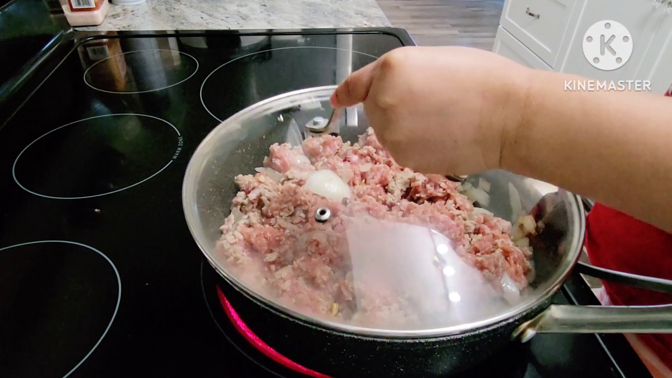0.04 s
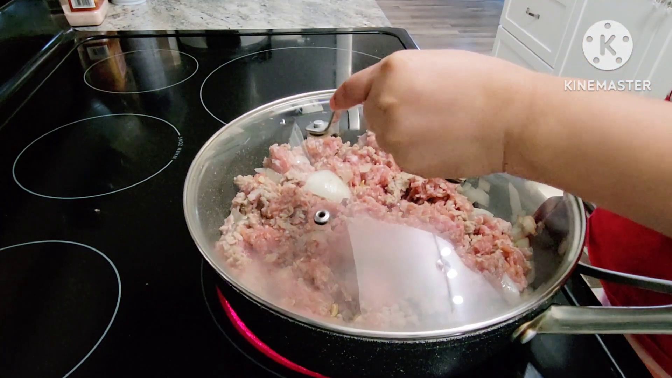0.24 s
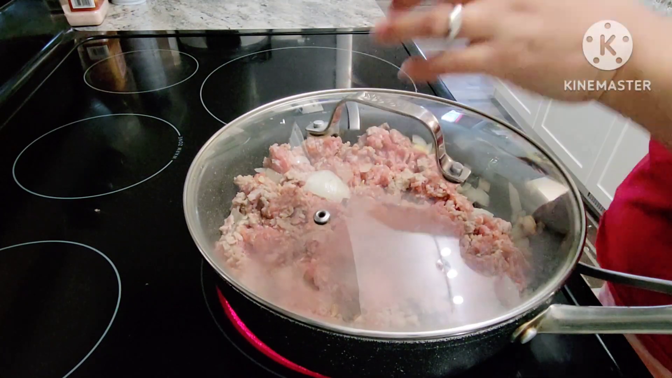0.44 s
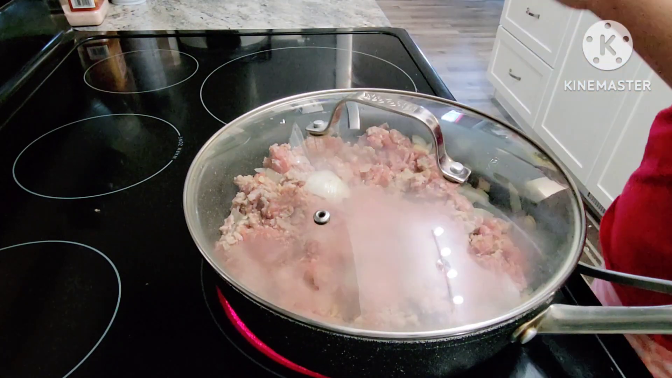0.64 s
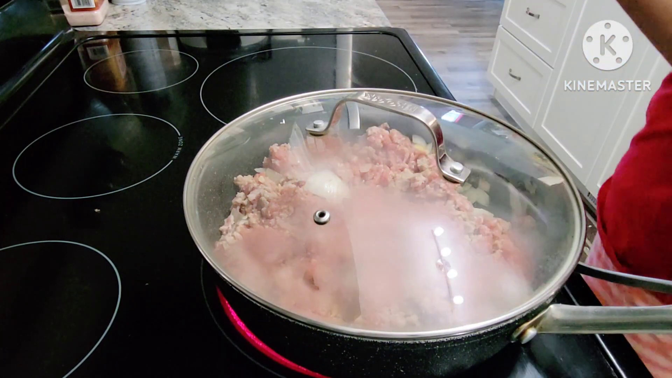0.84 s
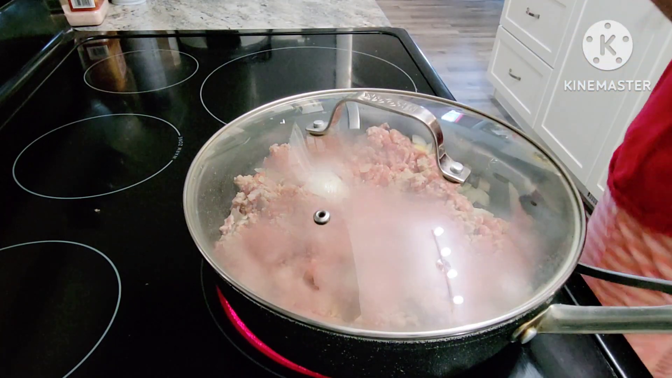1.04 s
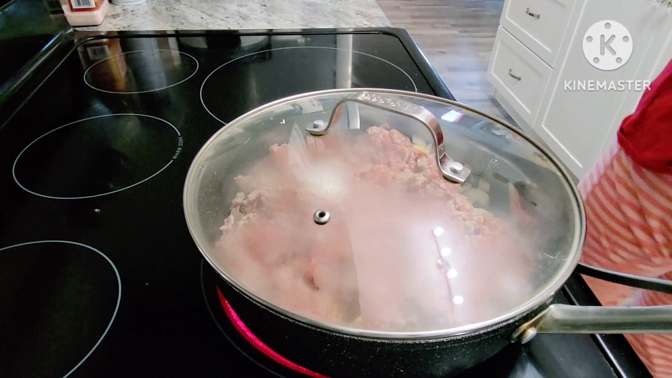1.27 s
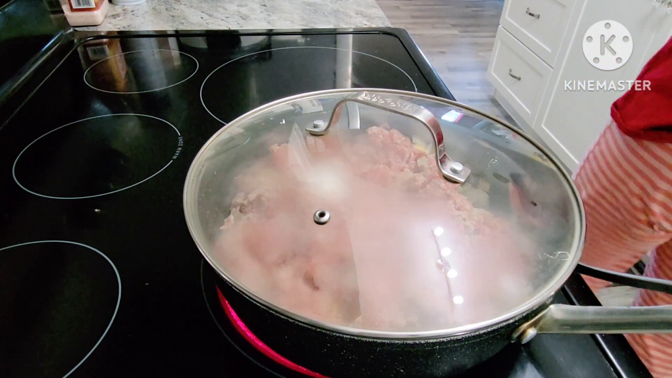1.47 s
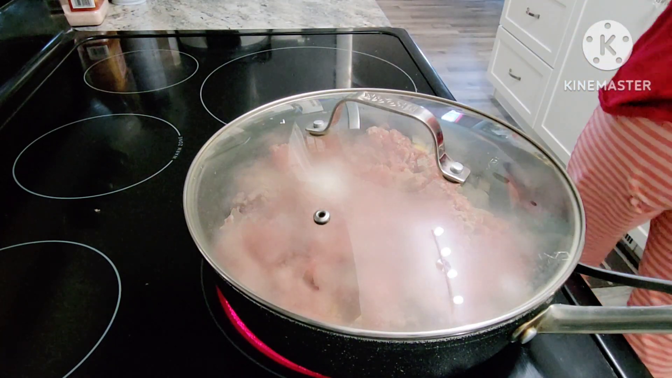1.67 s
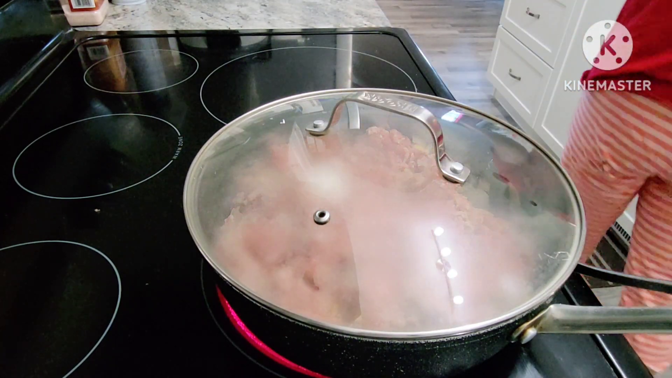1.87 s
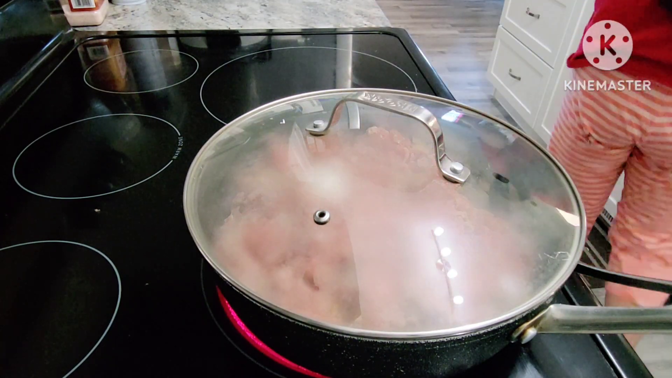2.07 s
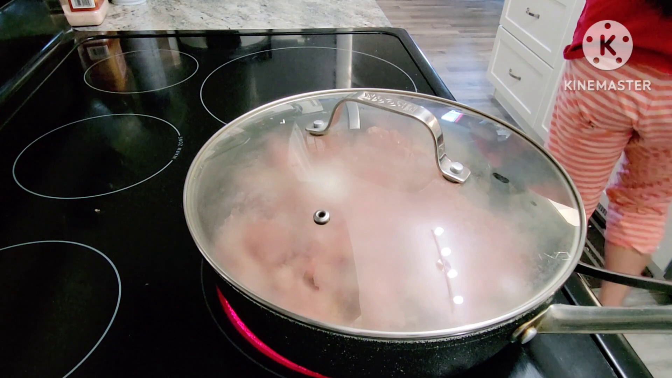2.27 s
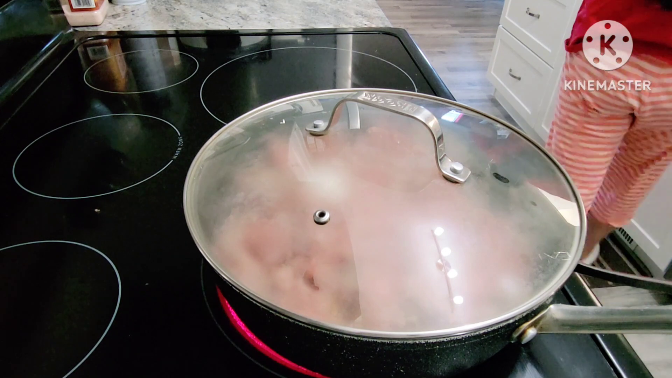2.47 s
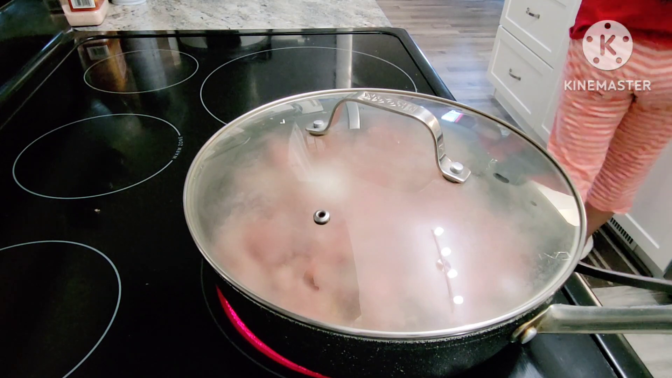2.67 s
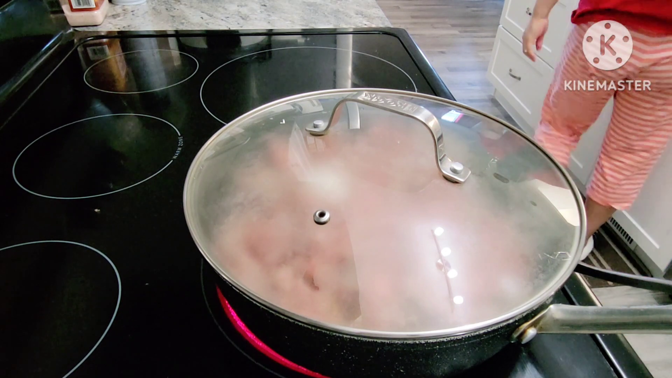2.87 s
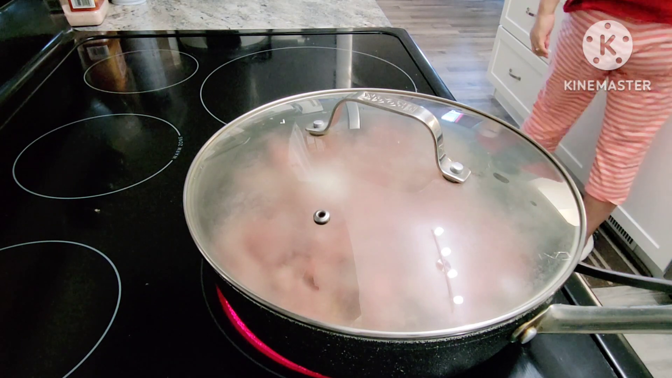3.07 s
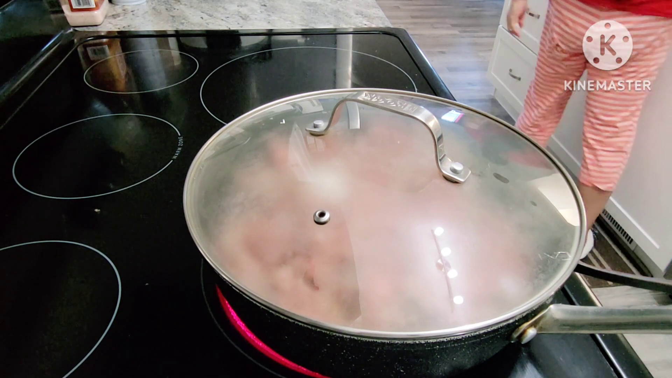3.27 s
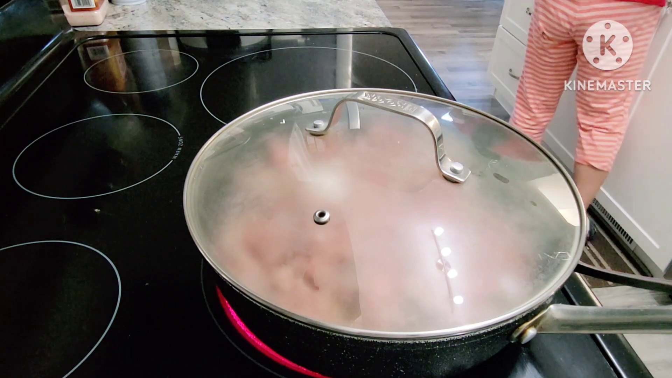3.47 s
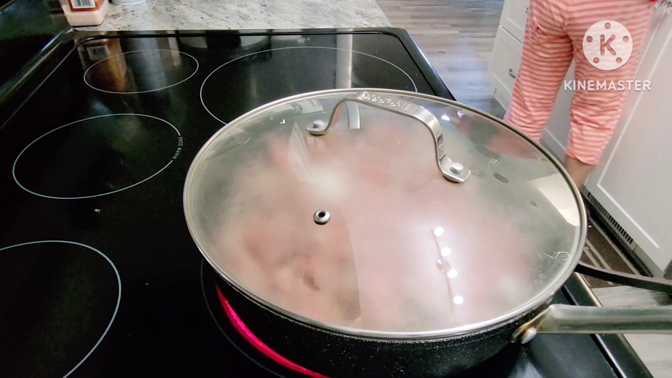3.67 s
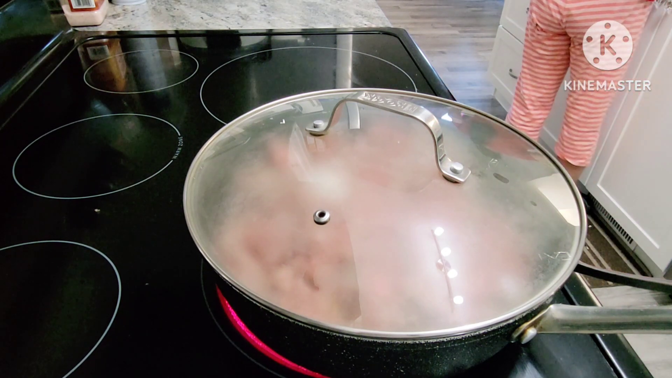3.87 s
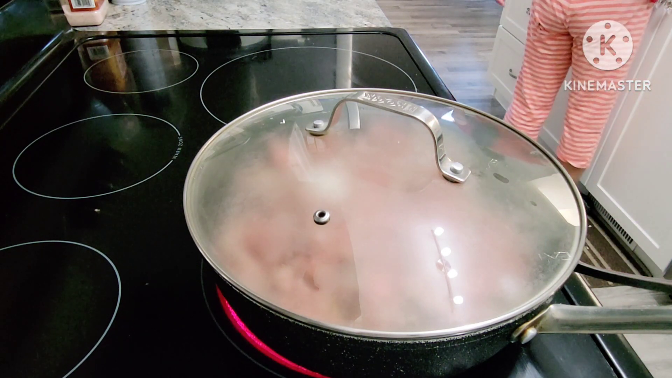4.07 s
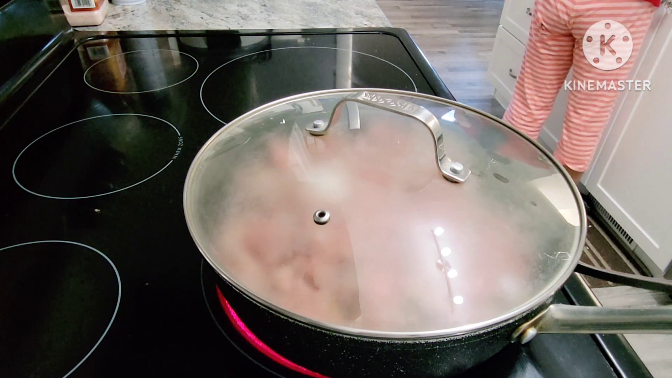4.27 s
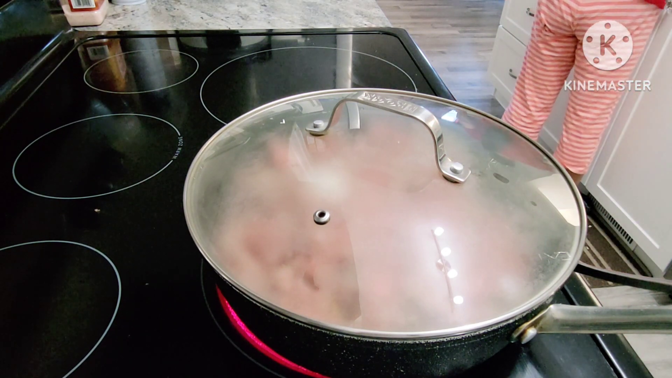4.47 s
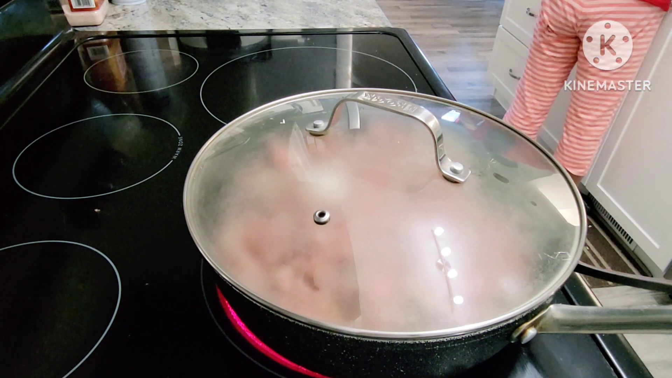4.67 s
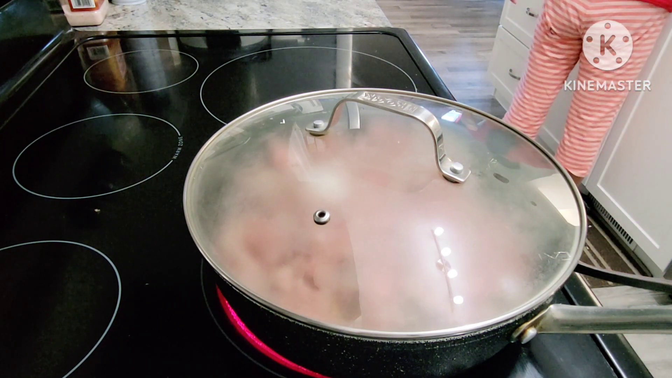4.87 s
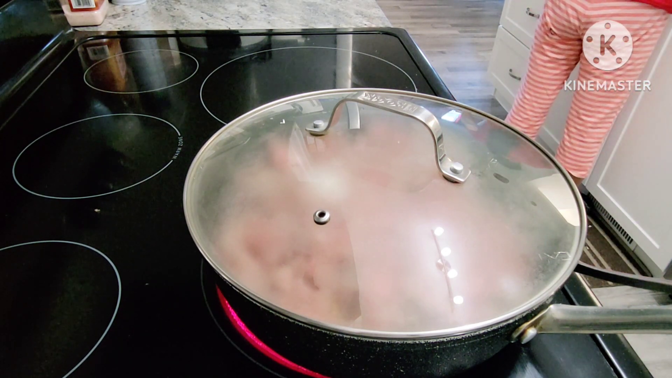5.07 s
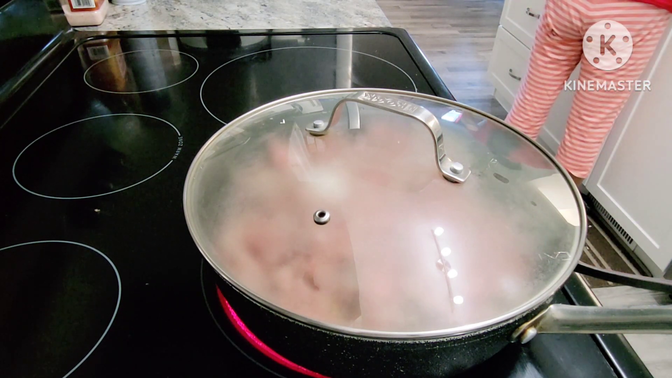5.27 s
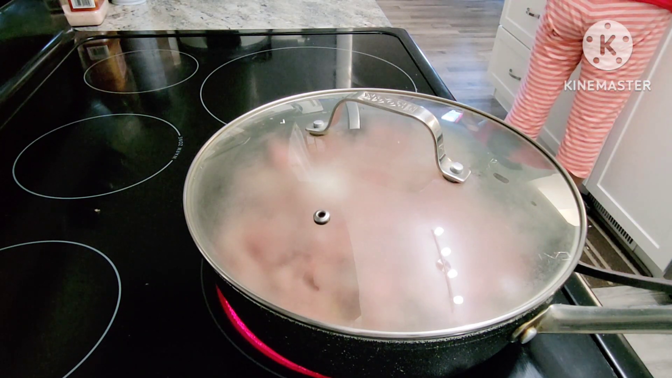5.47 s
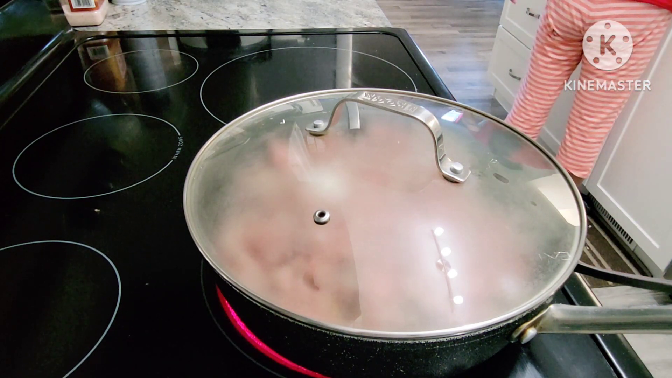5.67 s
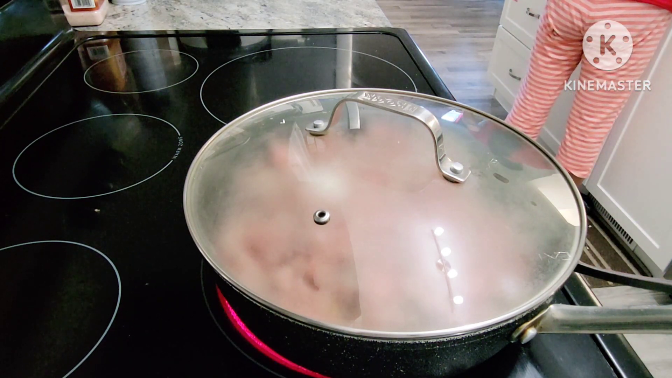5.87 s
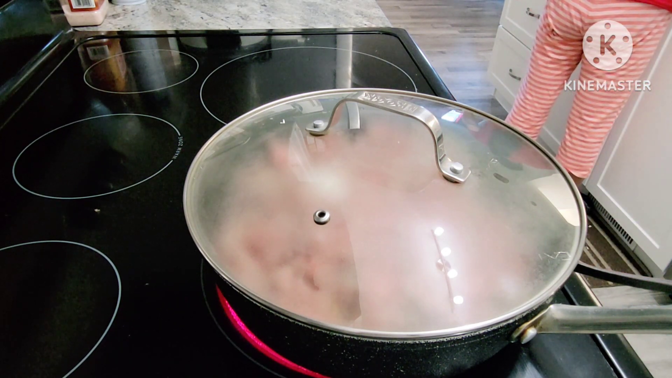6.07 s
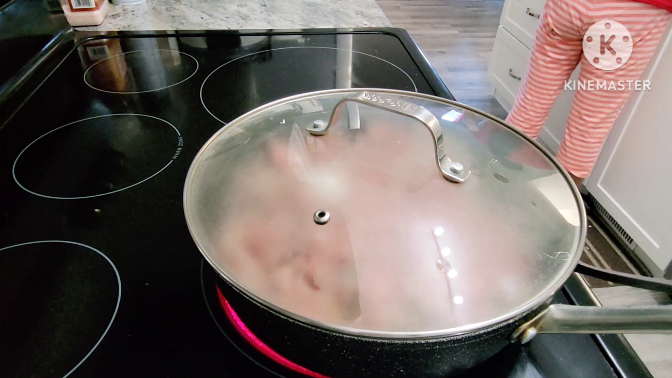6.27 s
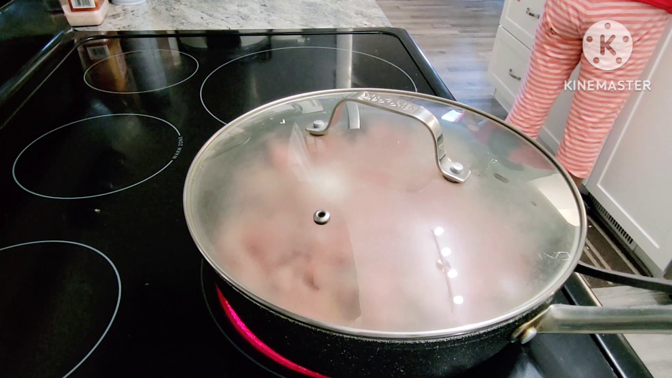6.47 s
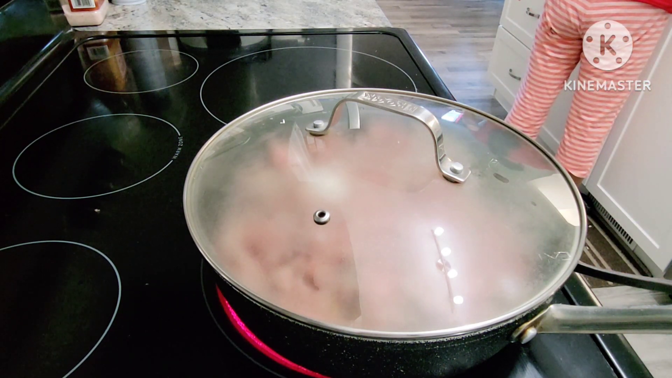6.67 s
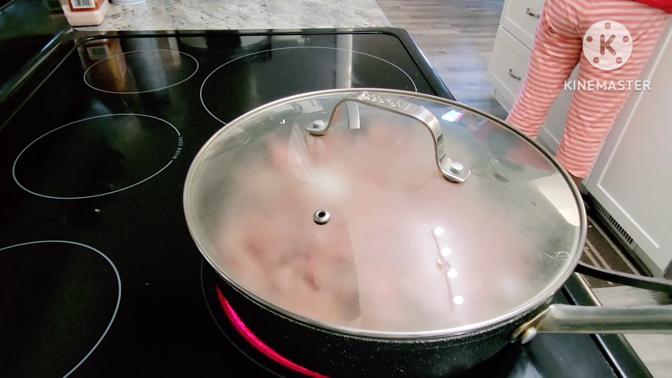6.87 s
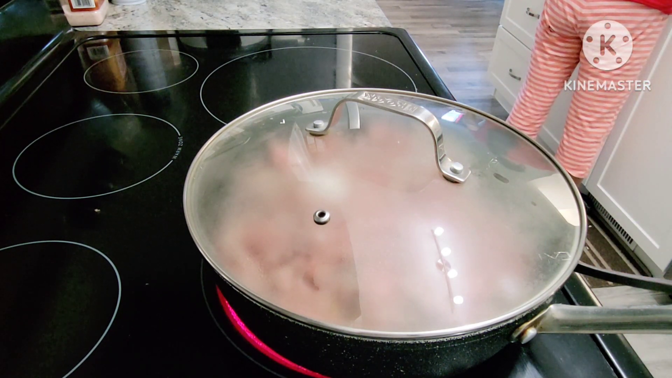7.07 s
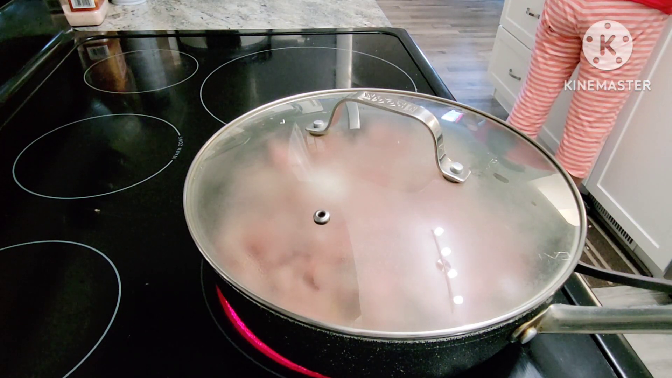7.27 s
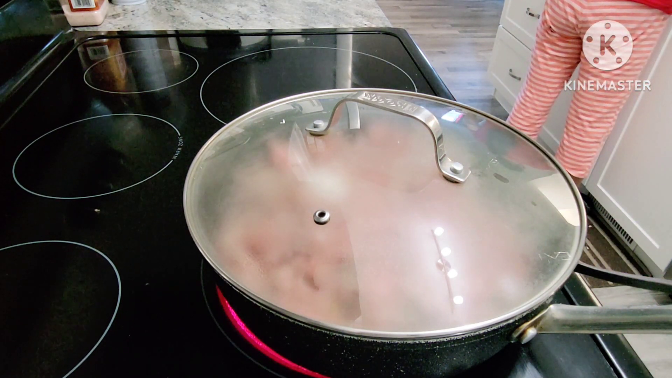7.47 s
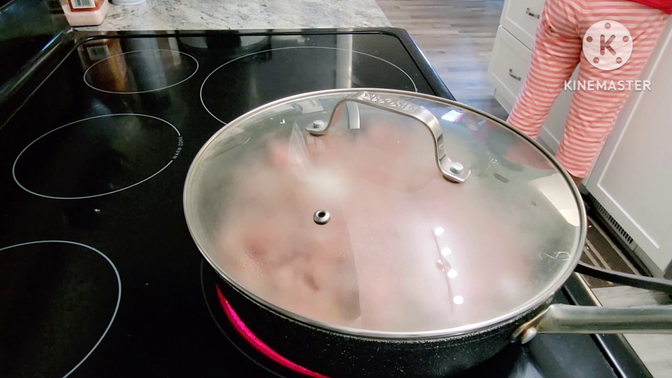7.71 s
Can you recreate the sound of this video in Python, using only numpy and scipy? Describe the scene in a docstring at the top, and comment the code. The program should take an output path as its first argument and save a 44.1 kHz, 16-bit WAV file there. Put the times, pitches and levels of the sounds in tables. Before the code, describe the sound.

A loud, near lid clank with a short glassy chatter and low pan thud starts the scene. Quiet stove hum, airy rush and very faint frying lie beneath. Across the lively room come dull footfalls, wooden drawer bumps with clacking tray and ringing cutlery, a dish knocking into a metal basin, and then steady bright tap spray with irregular splashes, heard in stereo by a phone.

```python
"""A glass lid clanks onto a frying pan close to a phone, over a humming stove with faintly sizzling meat.
The cook crosses the kitchen, bumps a drawer of utensils, lands a dish in the steel sink and turns on the tap,
whose spray hisses and patters to the end. Solid objects are decaying modes plus a noise crack; sizzle,
scuffs and water are dense random bursts; the small hard room answers the knocks with decaying noise."""
import sys
import numpy as np
from scipy import signal
from scipy.fft import rfft, irfft, next_fast_len
from scipy.io import wavfile

SR = 44100
rng = np.random.default_rng(int(sys.argv[2]) if len(sys.argv) > 2 else 0)


def wrap_up_sound(samples):
    """Save the sound to the file named by the first command line argument, as 16-bit audio."""
    columns = np.atleast_2d(samples).T
    # keep every value between -1 and 1, then stretch to whole-number steps
    tamed = np.clip(columns, -1, 1)
    steps = np.round(tamed * 32767).astype(np.int16)
    wavfile.write(sys.argv[1], SR, steps)


N = 341334
TIME = np.arange(N) / SR
TOP_HZ = 15480  # upper band limit

# How alike the two microphones hear. Each row: frequency in Hz, left-right correlation (no unit).
LIKENESS = [(60, 1), (130, 0.95), (290, 0.75), (640, 0.19), (1400, 0), (16000, 0)]


def undb(db):
    """Level law: decibels to amplitude gain."""
    return 10 ** (np.asarray(db) / 20)


def unit(x):
    """Normalisation: scale to rms 1."""
    return x / np.sqrt(np.mean(x ** 2))


def along(points, hz):
    """Logarithmic pitch scale: read (Hz, value) points linearly in log frequency."""
    f, value = np.transpose(points)
    return np.interp(np.log(np.maximum(hz, 1)), np.log(f), value)


def colour(x, points):
    """Spectral shaping: filter a sound by (Hz, dB) points, at rms 1."""
    n = x.shape[-1]
    size = next_fast_len(n)
    gain = undb(along(points, np.fft.rfftfreq(size, 1 / SR)))
    return unit(irfft(rfft(x, size) * gain, size)[..., :n])


def diffuse(n):
    """Diffuse field: white noise from all round, on which the microphones agree only in the bass."""
    size = next_fast_len(n)
    alike = np.clip(along(LIKENESS, np.fft.rfftfreq(size, 1 / SR)), -1, 1)
    mid, side = rfft(rng.standard_normal((2, size))) * np.sqrt([1 + alike, 1 - alike])
    return unit(irfft([mid + side, mid - side], size)[:, :n])


def walk(rate):
    """Slow random modulation of rms 1, changing about rate times a second."""
    knots = rng.standard_normal(4096)
    return unit(np.interp(TIME * rate, np.arange(len(knots)), knots))


def fade(t, t60):
    """Exponential damping: amplitude falls 60 dB in t60 seconds."""
    return np.exp(-np.log(1000) * t / t60)


def ramp(start_s, length_s):
    """Linear onset: rise evenly from 0 to 1."""
    return np.clip((TIME - start_s) / length_s, 0, 1)


def panned(x, pan_db):
    """Level-difference stereo: shift a sound by left minus right dB."""
    return x * undb(np.array([[pan_db], [-pan_db]]) / 2)


def kitchen(x, gap=0.0061):
    """Reverberation: dense reflections build up over gap seconds, then decay, the treble dying first."""
    # Room decay. Each row: frequency in Hz, decay time T60 in seconds.
    room_t60 = [(100, 0.44), (600, 0.66), (2500, 0.51), (5000, 0.44), (12000, 0.13)]
    t = np.arange(SR // 2) / SR
    noise, hz = rfft(diffuse(len(t))), np.fft.rfftfreq(len(t), 1 / SR)
    centres, t60s = np.transpose(room_t60)
    # overlapping bands that add up to the whole spectrum
    shares = [along(np.c_[centres, row], hz) for row in np.eye(len(centres))]
    tail = sum(irfft(noise * share, len(t)) * fade(t, t60) for share, t60 in zip(shares, t60s))
    build_up = 1 - np.exp(-(t / gap) ** 2)
    tail = unit(tail * build_up) / np.sqrt(len(t))
    return signal.fftconvolve(x, tail, axes=1)[:, :N]


def struck(blows, modes, crack, crack_db, crack_t60, rise_s, room_db, pan_db, detune=0,
           spot_db=2.2, room_modes_db=0):
    """Modal impact: each blow rings the modes and a dense crack; a soft contact leaves the treble out."""
    t = np.arange(SR // 2) / SR
    rings = []
    for k, (hz, db, t60) in enumerate(modes):
        # short waves reach the two microphones out of step
        skew = (-1) ** k * np.arccos(np.clip(along(LIKENESS, hz), .55, 1)) / 2
        phase = 2 * np.pi * hz * t + np.array([[skew], [-skew]])
        rings.append(undb(db) * fade(t, t60) * np.cos(phase))
    rings, swell = np.array(rings), 1 - np.exp(-t / rise_s)
    near, far = np.zeros((2, 2, N + len(t)))
    for s, db, hard_hz in blows:
        # every blow lands on another spot and favours other modes
        favour = undb(spot_db * rng.standard_normal(len(modes)))
        ring = np.tensordot(favour, rings, 1)
        # the changing contact shifts their pitch a little
        shifted = t * (1 + detune * rng.standard_normal())
        ring = np.array([np.interp(shifted, t, side) for side in ring])
        burst = undb(crack_db) * colour(diffuse(len(t)), crack) * fade(t, crack_t60)
        contact = signal.butter(2, min(hard_hz, TOP_HZ), fs=SR)
        start = max(int(s * SR), 0)
        ring, burst = undb(db) * signal.lfilter(*contact, swell * np.array([ring, burst]) + 1e-18)
        near[:, start:start + len(t)] += ring + burst
        # the room hears the object from all sides, so single modes can stand out less there
        far[:, start:start + len(t)] += undb(room_modes_db) * ring + burst
    return panned(near[:, :N] + undb(room_db) * kitchen(far[:, :N]), pan_db)


def rebounds(blows, gap_s, loss_db, soften, count):
    """Repeated contact: each blow makes count contacts loss_db apart, hardness scaled by soften each time."""
    contacts = []
    for s, db, hard_hz in blows:
        for k in range(count):
            contacts.append((s + k * gap_s, db - k * loss_db, hard_hz * soften ** k))
    return contacts


def droplets(rate, spread_db, t60):
    """Shot noise: tiny bursts at random moments, rate a second, most of them weak and a few strong."""
    strengths = undb(spread_db * np.minimum(rng.exponential(size=N), 5))
    sizes = strengths * (rng.random(N) < rate / SR)
    # summed burst power, each burst decaying exponentially
    power = signal.lfilter([1], [1, -fade(2 / SR, t60)], sizes ** 2)
    return unit(np.sqrt(power + 1e-18) * diffuse(N))


def surfaces(x, echo=0.42, count=8):
    """Comb filtering: early echoes off worktop and cupboards ripple each microphone's spectrum differently."""
    lags = (rng.uniform(.0005, .009, (2, count)) * SR).astype(int)
    sides = []
    for side, row in zip(x, lags):
        echoes = sum((-1) ** k * np.roll(side, lag) for k, lag in enumerate(row))
        sides.append(side + echo * echoes)
    return unit(np.array(sides))


def flare(x, s, half_s, db, hz, octaves):
    """Band-pass and Gaussian envelope: one band of a sound comes up and dies away."""
    edges = np.clip(hz * 2 ** (np.array([-.5, .5]) * octaves), 20, TOP_HZ)
    band = unit(signal.sosfilt(signal.butter(2, edges, "band", fs=SR, output="sos"), x))
    return undb(db) * np.exp(-((TIME - s) / half_s) ** 2) * band


def lid():
    """Modal impacts: soft nudges in the hand, a harder chattering drop, the pan's low thuds on the hob."""
    # Lid and pan together. Each row: frequency in Hz, level in dB, decay time T60 in seconds.
    lid_modes = [(188, -29, 0.041), (278, -13.5, 0.074), (321, -28, 0.18), (468, -32.5, 0.18),
                 (575, -34, 0.18), (730, -29.5, 0.16), (824, -26, 0.16), (878, -22, 0.089),
                 (1220, -35, 0.038), (1394, -25, 0.06), (1530, -30, 0.029), (1620, -27, 0.03),
                 (1785, -9, 0.039), (2186, -15.5, 0.046), (2220, -14, 0.029), (2420, -33, 0.049),
                 (2720, -14, 0.025), (3000, -17, 0.028), (3160, -22, 0.025), (3330, -19, 0.046),
                 (4110, -21.5, 0.041), (7430, -22, 0.021)]
    # Spectrum of their crack. Each row: frequency in Hz, relative level in dB.
    lid_crack = [(30, -38), (70, -18), (130, 7.5), (200, -16), (500, -2), (1050, -3.5), (1500, 0.5),
                 (2400, -4), (3450, -4), (4100, -15.5), (4700, -22), (8000, -23), (10000, -30),
                 (16000, -27)]
    # The rim nudges the pan while held. Each row: start in seconds, level in dB, hardness (low-pass) in Hz.
    nudges = [(0.001, -15, 400), (0.028, -15, 400), (0.094, -7, 300), (0.1165, 2, 440), (0.1748, 1, 616),
              (0.183, 7, 232)]
    # Let go, it clanks home and rattles to rest. Each row: start in seconds, level in dB, hardness in Hz.
    drop = [(0.2024, -0.5, 15000), (0.2078, -1, 4500), (0.2135, -6, 2200), (0.2245, -11, 900),
            (0.234, -13, 750), (0.244, -17, 700), (0.257, -15, 650)]
    # The lid's weight presses the pan onto the hob. Each row: start in seconds, level in dB, hardness in Hz.
    presses = [(0.181, -2, 197), (0.2058, -3, 250)]
    # The pan bouncing on the hob. Each row: frequency in Hz, level in dB, decay time T60 in seconds.
    pan_modes = [(85, -31, 0.045), (117, -12.5, 0.12)]
    # Spectrum of its crack. Each row: frequency in Hz, relative level in dB.
    pan_crack = [(30, -35), (110, 0), (250, -8), (600, -30), (16000, -63.5)]
    held = struck(nudges, lid_modes, lid_crack, crack_db=-17.0, crack_t60=0.051, rise_s=0.0034,
                  room_db=-24, pan_db=0.0, detune=0.014)
    dropped = struck(drop, lid_modes, lid_crack, crack_db=-8.5, crack_t60=0.046, rise_s=0.00038,
                     room_db=-16.5, pan_db=-1.0, detune=0.0082, room_modes_db=-7)
    thud = struck(presses, pan_modes, pan_crack, crack_db=-36, crack_t60=0.091, rise_s=0.0037,
                  room_db=-18, pan_db=0.3, detune=0.01)
    return held + dropped + thud


def scrapes(room_db=-12):
    """Stick-slip friction: the rim grates on the pan and sings briefly in one narrow band."""
    # The rim slides: middle in seconds, half length in seconds, level in dB, centre in Hz, width in octaves.
    rim_scrape = (0.119, 0.017, -41, 2330, 0.14)
    slips = droplets(rate=1200, spread_db=2, t60=.015)
    out = flare(slips, *rim_scrape)
    return out + undb(room_db) * kitchen(out)


def drawer():
    """Modal impacts: the wooden drawer booms softly, its tray clacks and the utensils jingle."""
    # The wooden drawer. Each row: frequency in Hz, level in dB, decay time T60 in seconds.
    wood_modes = [(113, -42, 0.23), (219, -30.5, 0.41), (272.4, -24, 0.18), (316, -31, 0.12),
                  (470, -38, 0.086), (562, -48, 0.19)]
    # Spectrum of its crack. Each row: frequency in Hz, relative level in dB.
    wood_crack = [(60, -23), (200, -7), (380, -7), (650, -13), (900, -17), (2500, -11.5), (7000, -13),
                  (16000, -34)]
    # Knocks of the drawer. Each row: start in seconds, level in dB, hardness in Hz.
    wood_knocks = [(1.7505, -11, 305), (1.8735, -1, 520), (1.8985, -2.5, 450), (2.077, -1.5, 504)]
    # The cutlery tray. Each row: frequency in Hz, level in dB, decay time T60 in seconds.
    tray_modes = [(392, -28, 0.11), (455, -30.5, 0.076), (580, -38, 0.15), (635, -35.5, 0.14),
                  (900, -49, 0.049)]
    # Spectrum of its crack. Each row: frequency in Hz, relative level in dB.
    tray_crack = [(100, -20), (250, -5.5), (450, -6), (650, -9), (900, -13.5), (2500, -11), (7000, -14.5),
                  (16000, -32)]
    # It slides against the drawer's ends. Each row: start in seconds, level in dB, hardness in Hz.
    tray_knocks = [(1.7505, -12.5, 1220), (1.879, -12, 700), (2.058, 1, 744), (2.077, 0.5, 1580),
                   (2.099, -1.5, 1200), (2.145, -4, 800), (2.39, -9.5, 550)]
    # Utensils, close pairs beating. Each row: frequency in Hz, level in dB, decay time T60 in seconds.
    metal_modes = [(1730, -44, 0.22), (1841, -37.5, 0.36), (1910, -41, 0.3), (1940, -43, 0.23),
                   (2117, -40, .3), (2247, -43.5, 0.54), (2256, -44, 0.26), (2640, -49, 0.24),
                   (3000, -45, 0.81), (3002, -43.5, 0.32), (3020, -34, 0.12), (3105, -37, 0.29),
                   (3133, -39, 0.33), (3680, -44, 0.25), (3930, -43.5, 0.43), (4000, -54, 0.28),
                   (4430, -53, 0.25), (4510, -54, 0.17), (4660, -48, 0.18), (4710, -50, 0.18)]
    # Spectrum of their crack. Each row: frequency in Hz, relative level in dB.
    metal_crack = [(500, -21), (1200, -3), (3000, 3), (4800, -8), (7000, 0), (9000, -12), (16000, -28)]
    # A run of knocks jolts them together. Each row: start in seconds, level in dB, hardness in Hz.
    metal_jolts = [(2.064, -14, 6000), (2.077, -2, 7000), (2.099, -3.5, 8000), (2.125, -10.5, 6000),
                   (2.152, -17, 7000)]
    wood = struck(wood_knocks, wood_modes, wood_crack, crack_db=-23.5, crack_t60=0.25, rise_s=0.0024,
                  room_db=-10, pan_db=-3.0, detune=0.0043)
    tray = struck(tray_knocks, tray_modes, tray_crack, crack_db=-23.5, crack_t60=0.18, rise_s=0.00068,
                  room_db=-9.5, pan_db=-2.5, detune=0.012)
    metal = struck(metal_jolts, metal_modes, metal_crack, crack_db=-41.5, crack_t60=0.13, rise_s=0.0033,
                   room_db=-6.5, pan_db=-1.0, detune=0.0017)
    return wood + tray + metal


def sink():
    """Chattering impact: a dish rebounds on the steel, strong in the room; the basin booms under its weight."""
    # Dish and steel. Each row: frequency in Hz, level in dB, decay time T60 in seconds.
    dish_modes = [(101, -25.5, 0.17), (177, -28, 0.11), (384, -33.5, 0.11), (513, -21.5, 0.081),
                  (587, -36, 0.18), (1006, -38, 0.25), (1058, -35.5, 0.27), (1290, -41, 0.12),
                  (1454, -31.5, 0.07), (1497, -30, 0.07), (1780, -34, 0.097), (1874, -36, 0.08),
                  (2380, -45, 0.08), (2790, -53, .12), (3020, -42, 0.18), (3560, -34, 0.085),
                  (3665, -43, 0.07), (3700, -41, 0.089), (4270, -45, .1), (4441, -40, 0.098),
                  (4610, -49, 0.14), (5100, -50, 0.15)]
    # Spectrum of their crack. Each row: frequency in Hz, relative level in dB.
    dish_crack = [(35, 3), (80, 6), (300, -10.5), (900, -21), (1600, -18.5), (2500, -20), (5500, -27),
                  (7500, -17.5), (9500, -33), (16000, -13)]
    # The dish lands, tips and settles. Each row: start in seconds, level in dB, hardness in Hz.
    dish_knocks = [(3.7315, -2, 8950), (3.7425, -1.5, 8000), (3.766, -13, 7000), (3.8, -17, 4500),
                   (3.836, -20, 3500)]
    # Hollow boom of the basin. Each row: frequency in Hz, level in dB, decay time T60 in seconds.
    basin_modes = [(91, -29, 0.22), (191, -25.5, 0.16), (238, -36, 0.089), (337, -34, 0.087),
                   (522, -27.5, 0.1), (597, -31, 0.114)]
    # Spectrum of its crack. Each row: frequency in Hz, relative level in dB.
    basin_crack = [(35, -16), (80, 1), (300, -11), (600, -11), (1200, -10), (16000, -38)]
    # The rocking dish thumps the basin. Each row: start in seconds, level in dB, hardness in Hz.
    basin_thumps = [(3.764, 2, 130), (3.812, -4, 250), (3.888, -8, 400), (3.902, -3, 700),
                    (3.929, -5.5, 330), (3.957, -13, 394)]
    chatter = rebounds(dish_knocks, gap_s=0.007, loss_db=8.5, soften=0.93, count=2)
    dish = struck(chatter, dish_modes, dish_crack, crack_db=-23.0, crack_t60=0.15, rise_s=0.0024,
                  room_db=-4.5, pan_db=-1.5, detune=0.0039)
    basin = struck(basin_thumps, basin_modes, basin_crack, crack_db=-28.5, crack_t60=0.15, rise_s=0.0029,
                   room_db=-8.5, pan_db=-1.5, detune=0.0052)
    return dish + basin


def spray(spray_gain_db=4, flutter_db=0.5):
    """Turbulent jet noise: the valve opens in two turns and the aerator hisses almost evenly."""
    # Spectrum of the jet. Each row: frequency in Hz, relative level in dB.
    jet_colour = [(1500, -13.5), (2300, -15), (2700, -9.5), (3100, -7.5), (3700, -9), (4450, -2),
                  (4900, -9), (5900, -9.5), (6800, -4.5), (7300, 3), (8200, -4.5), (9200, -9),
                  (10400, -5.5), (10900, -9), (11600, -2.5), (12800, 1.5), (14000, -4.5), (15500, -6)]
    # Stereo lean of the jet. Each row: frequency in Hz, left minus right in dB.
    jet_pan = [(3000, -2), (6000, 0), (7300, 3.5), (8200, -4), (9500, 4), (11000, -5.5), (12700, -8.5),
               (14000, -6), (15500, -3)]
    # Course of the full flow. Each row: time in seconds, level in dB before gain and flutter.
    flow_level = [(4.68, -43.5), (5.02, -40.5), (5.34, -44), (5.65, -41), (6.0, -42.5), (6.3, -41.5),
                  (7.7, -42)]
    open_s, open_turn_s, full_s, full_turn_s = 4.5, 0.09, 4.615, 0.063
    part_open_db = -13  # part-open tap against full flow
    flow_db = np.interp(TIME, *np.transpose(flow_level))
    throttle_db = part_open_db * (1 - ramp(full_s, full_turn_s))
    valve = ramp(open_s, open_turn_s) * undb(throttle_db)
    jet = colour(droplets(rate=14000, spread_db=0.5, t60=0.006), jet_colour)
    jet = surfaces(jet, echo=0.21, count=24)
    lean_db = along(jet_pan, np.fft.rfftfreq(N, 1 / SR))
    jet = unit(irfft(rfft(jet) * undb(np.array([lean_db, -lean_db]) / 2), N))
    return valve * jet * undb(flow_db + spray_gain_db + flutter_db * walk(25))


def wander(x, spread_db, rate):
    """Independent band modulation: each half-octave band swells and sinks by itself."""
    octaves = np.log2(np.maximum(np.fft.rfftfreq(N, 1 / SR), 1))
    centres = np.arange(9, 14, .5)  # log2 of Hz
    spectrum = rfft(x)
    total = 0
    for row in np.eye(len(centres)):
        band = irfft(spectrum * np.interp(octaves, centres, row), N)
        total = total + band * undb(spread_db * walk(rate))
    return unit(total)


def patter():
    """Random drop impacts: water hits the basin once the tap is open, and now and then splashes up."""
    # Spectrum of the drops. Each row: frequency in Hz, relative level in dB.
    drop_colour = [(250, -40), (500, 13), (900, 5.5), (1450, 14.5), (2000, 7.5), (2800, 18.5), (3600, 14.5),
                   (4400, 7), (6000, 12), (12000, -55)]
    # The broken stream splashes up. Each row: middle in seconds, half length in seconds, level in dB,
    # centre in Hz, width in octaves.
    splashes = [(5.845, 0.04, -50.5, 2400, 0.4), (6.175, 0.035, -46.5, 4330, 0.86),
                (6.48, 0.034, -51.5, 1820, 1.2), (6.635, 0.03, -49, 1500, 2),
                (6.687, 0.042, -46, 3600, 0.9), (7.11, 0.046, -53.5, 1530, 0.2)]
    start_s, rise_s, level_db = 4.51, 0.065, -52.5
    # later it grows louder and slowly eases
    surge_s, surge_db, surge_rise_s, surge_ease_s = 6.38, 5.5, 0.2, 0.85
    easing = np.exp(-np.maximum(TIME - surge_s - surge_rise_s, 0) / surge_ease_s)
    surge = ramp(surge_s, surge_rise_s) * easing
    drops = surfaces(colour(droplets(rate=400, spread_db=2.0, t60=0.042), drop_colour), echo=0.42)
    drops = wander(drops, spread_db=4.5, rate=14)
    steady = drops * ramp(start_s, rise_s) * undb(level_db + surge_db * surge)
    spatter = droplets(rate=760, spread_db=2.5, t60=0.025)
    return steady + sum(flare(spatter, *splash) for splash in splashes)


def steps():
    """Two-part impact: the heel lands, then the ball of the foot, weaker and harder."""
    # The floor. Each row: frequency in Hz, level in dB, decay time T60 in seconds.
    floor_modes = [(114.5, -26.5, 0.068), (144, -24.5, 0.052), (202, -41, 0.19), (313, -39.5, 0.11)]
    # Spectrum of its crack. Each row: frequency in Hz, relative level in dB.
    floor_crack = [(40, -30), (130, -26), (450, 22), (800, -21), (16000, -18)]
    # Heels on the floor. Each row: start in seconds, level in dB, hardness in Hz.
    heels = [(1.685, -6, 149), (2.40, -6.5, 170), (2.54, -5.5, 218), (3.178, 4.5, 258), (6.425, -11, 220)]
    blows = rebounds(heels, gap_s=0.041, loss_db=8, soften=1.6, count=2)
    return struck(blows, floor_modes, floor_crack, crack_db=-35, crack_t60=0.022, rise_s=0.0046,
                  room_db=-6, pan_db=0.0)


def scuffs(room_db=-8):
    """Friction noise: dense tiny slips swell and die with each movement."""
    # Sliding and brushing of lid, drawer and clothes. Each row: middle in seconds, half length in seconds,
    # level in dB before the low-pass, brightness (low-pass) in Hz.
    movements = [(0, 0.068, -33.5, 3350), (0.119, 0.028, -29.5, 3900), (0.182, 0.016, -26, 6000),
                 (1.863, 0.077, -45.5, 9000), (1.894, 0.054, -33, 704), (2.585, 0.05, -50.5, 13700),
                 (3.195, 0.037, -43, 8900), (4.39, 0.064, -50.5, 9800)]
    # Spectrum of the slips. Each row: frequency in Hz, relative level in dB.
    slip_colour = [(200, 8), (500, 4.5), (1000, -1), (1600, -8.5), (2400, -5.5), (3500, -5), (5000, -13),
                   (7500, -7.5), (10000, -12), (15000, 1.5)]
    slips = colour(droplets(rate=2500, spread_db=2, t60=.015), slip_colour)
    out = 0
    for s, half_s, db, hz in movements:
        dulled = signal.lfilter(*signal.butter(2, min(hz, TOP_HZ), fs=SR), slips)
        out = out + undb(db) * np.exp(-((TIME - s) / half_s) ** 2) * dulled
    return out + undb(room_db) * kitchen(out)


def hollow(x):
    """Cavity resonance: lift a sound at the hollow resonances of pan and stove."""
    # Resonances. Each row: centre in Hz, width in Hz, lift in dB.
    cavities = [(431, 31, 8.5), (518, 40, 6), (512, 22, 3.5), (697, 41, 5.5), (837, 67, 7), (1020, 51, 5.5),
                (1333, 30, 7), (1665, 68, 3), (2220, 43, 8)]
    hz = np.fft.rfftfreq(N, 1 / SR)
    lift_db = sum(db / (1 + (2 * (hz - centre) / width) ** 2) for centre, width, db in cavities)
    return unit(irfft(rfft(x) * undb(lift_db), N))


def stove(air_db=-47, sizzle_db=-57.0):
    """Tones and steady noise: mains hum, a low rush of air and fat frying faintly under the lid."""
    # Mains hum. Each row: frequency in Hz, rms level in dB.
    hum_tones = [(59.2, -80), (118.4, -53.5), (296.1, -64.5)]
    # Spectrum of the air rush. Each row: frequency in Hz, relative level in dB.
    air_colour = [(25, -23), (55, 0), (75, -10), (100, 1), (125, 5), (145, -17.5), (175, -10.5),
                  (230, -24.5), (295, -1), (360, -22.5), (480, -22), (900, -19), (1700, -29), (5000, -37.5)]
    # Spectrum of the muffled sizzle. Each row: frequency in Hz, relative level in dB.
    sizzle_colour = [(700, -16), (1400, 8), (2300, 1.5), (3100, 6.5), (4000, 0), (4800, -2.5), (6200, -0.5),
                     (9500, -8), (13000, -7.5), (15500, -14)]
    hum = 0
    for hz, db in hum_tones:
        phase = 2 * np.pi * hz * TIME + .5 * walk(3.15)
        hum = hum + undb(db) * unit(np.sin(phase))
    air = undb(air_db) * hollow(colour(diffuse(N), air_colour))
    fat = droplets(rate=5000, spread_db=2.2, t60=.012)
    sizzle = undb(sizzle_db) * surfaces(hollow(colour(fat, sizzle_colour)), echo=0.21)
    return hum + air + sizzle


def scene():
    """Superposition: lid and stove at the phone; drawer, steps, sink and tap across the kitchen."""
    at_phone = lid() + scrapes() + stove()
    across = drawer() + sink() + spray() + patter() + steps()
    return at_phone + across + scuffs()


def record(dry):
    """Band limits and soft saturation: the phone thins the deepest bass, rounds peaks and cuts the top."""
    thinned = signal.sosfilt(signal.butter(3, 38, "high", fs=SR, output="sos"), dry)
    rounded = np.tanh(thinned)
    return signal.sosfilt(signal.ellip(12, .2, 80, TOP_HZ, fs=SR, output="sos"), rounded)


dry = scene()
out = record(dry)
wrap_up_sound(out)
```